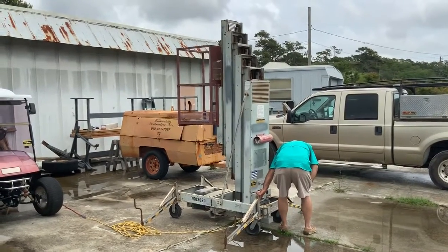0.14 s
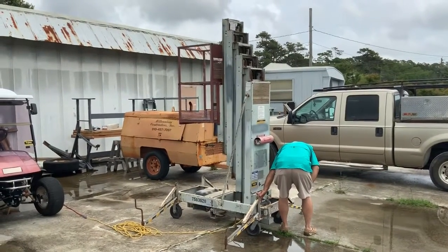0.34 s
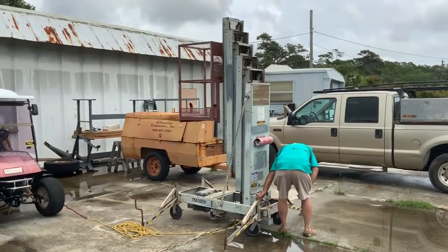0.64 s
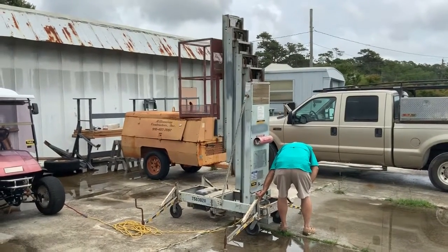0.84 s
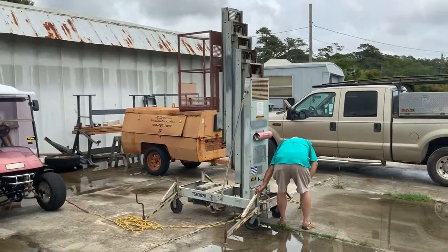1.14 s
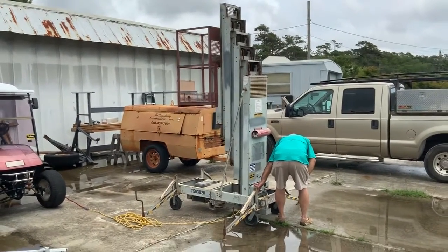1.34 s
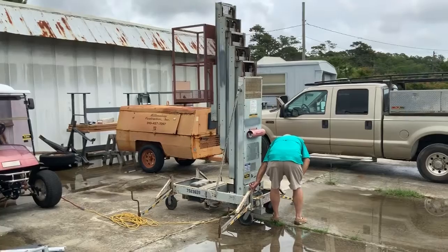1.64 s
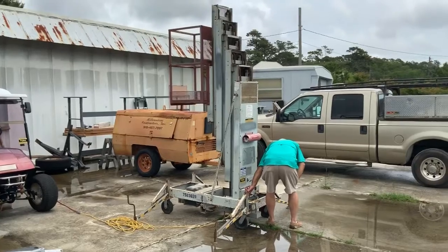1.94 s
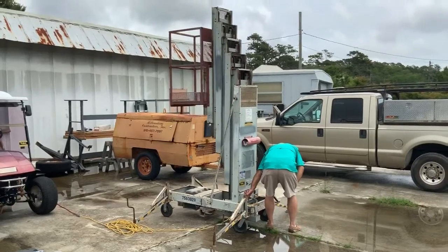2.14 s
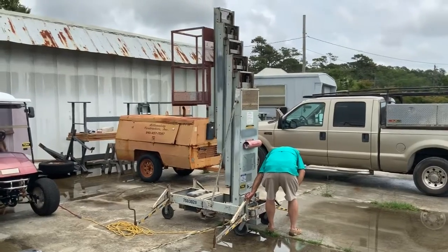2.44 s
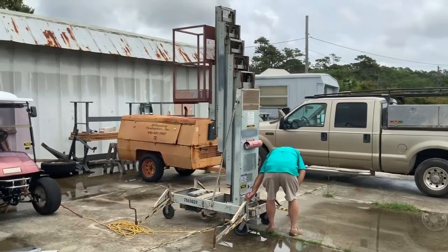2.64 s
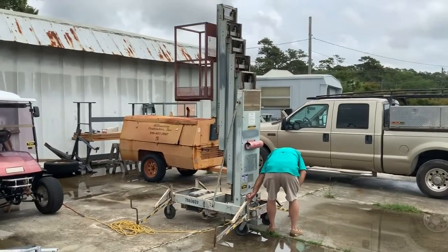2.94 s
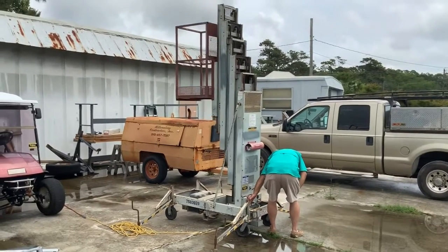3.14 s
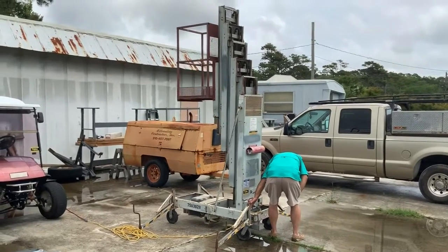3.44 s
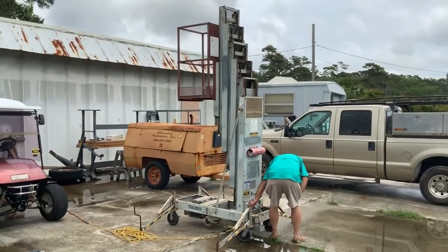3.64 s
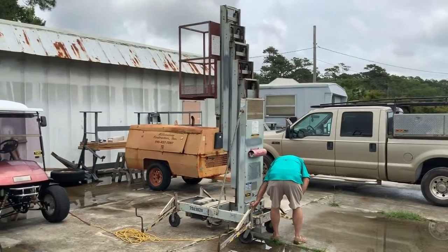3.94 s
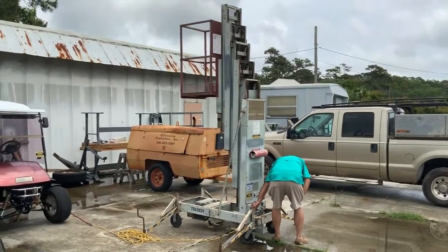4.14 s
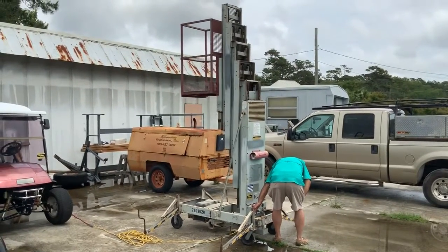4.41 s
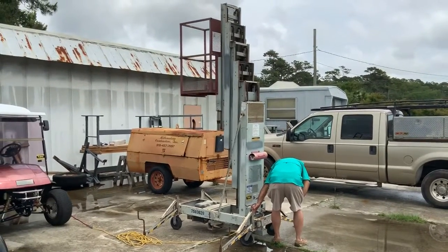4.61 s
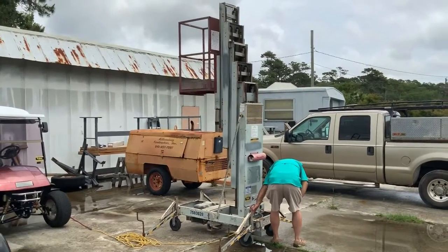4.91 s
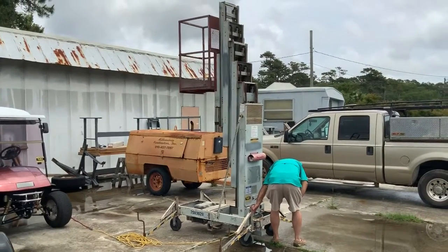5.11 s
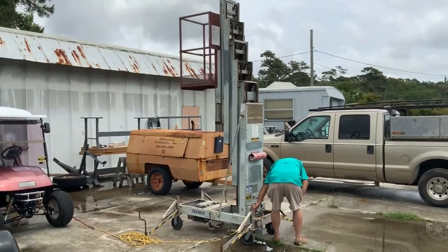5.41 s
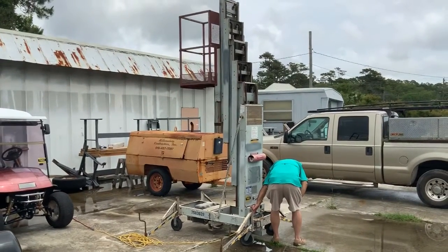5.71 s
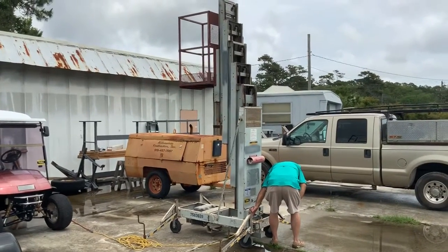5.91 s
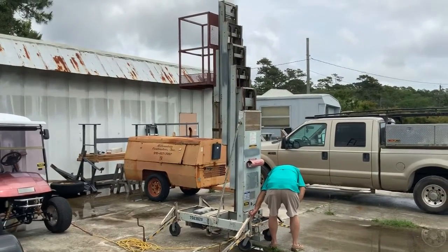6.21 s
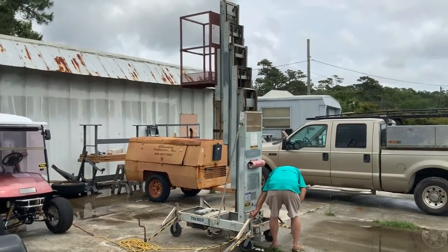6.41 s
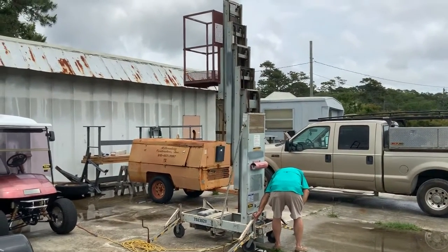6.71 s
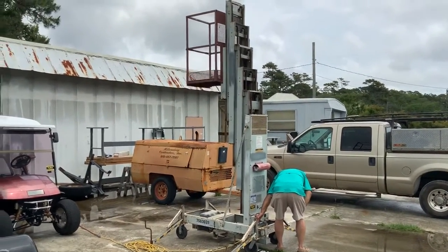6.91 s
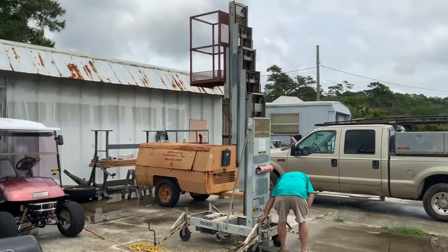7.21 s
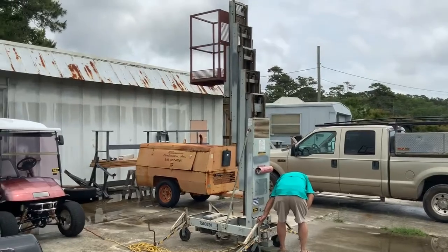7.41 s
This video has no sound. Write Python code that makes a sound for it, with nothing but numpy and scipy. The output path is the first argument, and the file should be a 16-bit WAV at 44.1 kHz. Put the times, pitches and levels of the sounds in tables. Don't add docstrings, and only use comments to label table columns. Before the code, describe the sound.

Outdoors in a yard, a lift's electric hydraulic pump runs throughout: a buzzy, slightly wavering whine over dense motor roar and oil hiss, with a thin metallic rubbing ring. Small chain clinks and dry scrapes gather in the first three seconds, then mostly faint scrapes, and one duller knock near the end. A distant bird whistles a few times, and low wind gusts thump the stereo microphone, strongest around three and a half seconds.

```python
import sys
import numpy as np
from scipy import signal
from scipy.fft import rfft, irfft, next_fast_len
from scipy.io import wavfile
from scipy.ndimage import uniform_filter1d

SR = 44100
rng = np.random.default_rng(int(sys.argv[2]) if len(sys.argv) > 2 else 0)


def magnitude_from_level(level_db):
    exponent = np.asarray(level_db, float) / 20
    return 10 ** exponent


def generate_wav(signal):
    frames = np.transpose(np.atleast_2d(signal))
    scaled = np.clip(frames, -1, 1) * 32767
    pcm = np.round(scaled).astype(np.int16)
    wavfile.write(sys.argv[1], SR, pcm)


N = 333396
TIME = np.arange(N) / SR
# time_s, tooth_rate_hz
TOOTH_RATE = [(0.0, 287.22), (0.33, 284.5), (0.99, 290.08), (1.47, 287.64), (2.28, 289.56), (2.52, 292.23),
              (2.61, 290.36), (3.42, 293.09), (4.11, 290.26), (4.56, 292.96), (4.68, 291.45),
              (4.86, 293.22), (5.04, 289.73), (5.49, 291.56), (6.48, 288.17), (6.99, 287.91),
              (7.26, 294.58), (7.56, 294.54)]


def evened(x):
    return x / np.sqrt(np.mean(x ** 2) + 1e-20)


def read(points, hz):
    f, value = np.transpose(points)
    return np.interp(np.log(hz + 1), np.log(f + 1), value)


def curve(rows, column=1):
    rows = np.array(rows)
    return np.interp(TIME, rows[:, 0], rows[:, column])


def drift(top_hz, low_hz=0.2986):
    t = TIME[::64]
    slow = 0
    for f in np.geomspace(low_hz, top_hz, num=24):
        slow = slow + np.sin(2 * np.pi * (f * t + rng.random()))
    return np.interp(TIME, t, evened(slow))


def coloured(gain, patchy_db=0):
    real, imaginary, patches = rng.standard_normal((N // 256 + 5, 513, 3)).T
    patches = uniform_filter1d(patches, size=14, axis=0)
    patches = evened(uniform_filter1d(patches, size=12, axis=1))
    weight = gain(np.fft.rfftfreq(1024, 1 / SR))[:, None] * magnitude_from_level(patchy_db * patches)
    spectra = (real + 1j * imaginary) * weight
    return evened(signal.istft(spectra, nperseg=1024, noverlap=768)[1][:N])


def resonate(x, hz, width):
    r = np.exp(-np.pi * width / SR)
    pole = r * np.exp(2j * np.pi * hz / SR)
    return 2 * signal.lfilter([(1 - r) ** 2], [1, -2 * pole, pole * pole], x).real


def place(events):
    track = np.zeros(N + SR)
    for s, sound in events:
        track[round(s * SR):][:len(sound)] += sound
    return track[:N]


def ports(shared, left=None, right=None):
    # frequency_hz, left_lag_turns
    lag_points = [(0, 0), (250, .02), (700, .15), (1150, .5), (2620, 1.5), (3900, 2.5), (4800, 3.5),
                  (5930, 4.5), (7400, 5.5), (9000, 6.5), (16750, 11.5)]
    # frequency_hz, likeness (0-1)
    likeness_points = [(40, 0.88), (130, 0.92), (400, 0.72), (1050, 0.12), (1400, 0.95), (2300, 0.58),
                       (3000, 0.74), (4000, 0.75), (5500, 0.84), (7200, 1), (8200, 0.64), (10000, 0.98),
                       (15000, 0.97)]
    # frequency_hz, left_minus_right_db
    balance_points = [(200, 0.3), (470, -1), (900, 2), (1250, 4), (1800, 1), (2300, 1.2), (2900, 5.5),
                      (3600, 1), (7000, -0.5), (8000, 1.8), (10000, -0.4)]
    size = next_fast_len(N)
    hz = np.fft.rfftfreq(size, 1 / SR)
    late = np.exp(-2j * np.pi * np.interp(hz, *np.transpose(lag_points)))
    both = rfft(shared, size) * [late, np.ones(len(hz))]
    if left is not None:
        likeness = read(likeness_points, hz)
        both = np.sqrt(likeness) * both + np.sqrt(1 - likeness) * rfft([left, right], size)
    balance = magnitude_from_level(np.outer([.5, -.5], read(balance_points, hz)))
    return irfft(both * balance, size)[:, :N]


def thump(s, db, hz, length):
    t = np.arange(-1500, 1500) / SR
    bell = np.exp(-(t / length) ** 2 / 2)
    angle = 2 * np.pi * np.cumsum(hz * (0.24 + 1.02 * bell ** 2)) / SR
    angle += np.pi * rng.integers(2) + 0.62 * rng.standard_normal() - angle[1500]
    swing = np.cos(angle) + 0.11 * bell * np.cos(2 * angle)
    return s - 1500 / SR, magnitude_from_level(db - 1.0) * bell * swing


def wind():
    # frequency_hz, density_db_per_hz
    turbulence = [(15, -39), (30, -15), (55, 14.5), (100, 0.5), (150, -7), (250, -7.5), (400, -33.5)]
    # centre_s, half_length_s, over_calm_db
    gusts = [(0.15, 0.13, 1.5), (.65, 0.15, -1), (0.85, 0.089, 0), (1.76, 0.092, 3), (3.5, 0.79, 1),
             (6.6, 0.58, 2.5), (6.1, 0.19, -0.5), (4.7, 0.1, 2), (2.54, .15, 0.5)]
    # peak_s, peak_db, pitch_hz, length_s; gusts make all but the brief click at 0.951 s, where the
    thump_rows = [(0.067, -46, 54, 0.0087), (0.136, -27.5, 60, 0.0079), (0.14, -39.5, 170, .008),
                  (0.172, -34, 76, 0.0097), (0.199, -28, 65, 0.0085), (0.237, -33, 54, 0.0094),
                  (0.452, -38, 92, .01), (0.747, -40, 60.4, 0.024), (1.729, -37, 71.4, 0.015),
                  (2.052, -42, 81.6, 0.013), (2.919, -31.5, 69, 0.0071), (2.953, -31.5, 91, 0.0099),
                  (3.036, -35, 65, .01), (3.077, -32, 69.2, 0.0064), (3.207, -28.5, 92, 0.013),
                  (3.215, -36, 190, 0.0095), (3.126, -37, 55, .02), (3.252, -32, 53.9, 0.015),
                  (3.356, -41, 69.96, .01), (3.41, -21.5, 81, 0.011), (3.461, -34, 99, 0.0076),
                  (3.493, -25, 79.6, 0.005), (3.522, -35, 59.3, 0.013), (3.572, -27, 74.4, 0.0095),
                  (3.643, -33, 59, 0.009), (3.745, -39, 80, 0.0098), (3.782, -32.5, 111, 0.014),
                  (4.063, -45, 80.3, 0.0073), (4.45, -40, 70.1, 0.0062), (0.951, -45, 230, .006),
                  (6.943, -35, 70.24, 0.0084), (7.505, -36, 69.8, 0.024)]
    calm_db, pan_db, arrival_s = -46.5, 2., 0.00049

    def gain(hz):
        return magnitude_from_level(read(turbulence, hz))

    level_db = calm_db + 1.6 * drift(15)
    for s, half, db in gusts:
        level_db = level_db + db * np.exp(-((TIME - s) / half) ** 2)
    left, right = [], []
    for row in thump_rows:
        s, sound = thump(*row)
        pan, lag = [pan_db, arrival_s] * rng.standard_normal(2)
        left.append((s + lag, sound * magnitude_from_level(pan / 2)))
        right.append((s - lag, sound * magnitude_from_level(-pan / 2)))
    steady = magnitude_from_level(level_db) * ports(coloured(gain), coloured(gain), coloured(gain))
    return steady + [place(left), place(right)]


def call(s, length, top_hz, db):
    rise_hz_per_s, fall_hz_per_s = 1100, 2200
    u = np.linspace(0, 1, round(length * SR))
    rise = rise_hz_per_s * length * np.clip(1 - u / .5, 0, 1) ** 2
    fall = fall_hz_per_s * length * np.clip((u - .56) / .44, 0, 1) ** 1.4
    flutter, husk = (evened(uniform_filter1d(noise, size=400))[:len(u)]
                     for noise in rng.standard_normal((2, 6000)))
    angle = 2 * np.pi * np.cumsum(top_hz - rise - fall + 19 * husk) / SR
    whistle = np.sin(angle) + .16 * np.sin(2 * angle)
    level = 2 ** .5 * magnitude_from_level(db + 3.0 * flutter - 2.5 * u)
    return s, level * signal.windows.tukey(len(u), .2) * whistle


def bird():
    # start_s, length_s, top_hz, level_db (rms)
    calls = [(1.387, 0.061, 1750, -48), (1.646, .125, 1742, -45.5), (2.139, 0.126, 1726, -49),
             (2.626, .12, 1727, -44), (2.751, .02, 1716, -49), (5.21, 0.124, 1630, -59),
             (5.55, 0.086, 1730, -57), (6.095, 0.12, 1660, -54)]
    direct = place(call(*row) for row in calls)
    return direct + .25 * np.roll(direct, 900) + .38 * np.roll(direct, 2300)


def clink(s, db, hz):
    t = np.arange(1500) / SR
    ring = np.sin(2 * np.pi * hz * t) + 0.28 * rng.standard_normal(len(t))
    return s - .001, magnitude_from_level(db) * ring * (t / 0.0031) * np.exp(1 - t / 0.0018)


def scrape(s, db, hz, length, width):
    t = np.arange(6000) / SR / length
    grains = rng.standard_normal(6000) * magnitude_from_level(1.5 * rng.standard_normal(60).repeat(100))
    puff = evened(resonate(grains, hz, width))
    return s - .002, 0.75 * magnitude_from_level(db) * t ** 0.38 * np.exp(-t) * puff


def chain_and_slides():
    # peak_s, peak_db, ring_hz
    clinks = [(1.198, -36, 3130), (1.295, -39, 3120), (1.397, -40, 3320), (1.802, -38, 3040),
              (1.815, -40, 3130), (1.858, -38, 3470), (2.041, -30.5, 2950), (2.062, -32, 2970),
              (2.125, -33, 2980), (2.143, -37, 3120), (2.293, -33.5, 3060), (2.753, -35, 2900),
              (2.839, -38, 3020), (2.755, -40, 3500), (7.305, -33, 1450), (7.31, -47, 1150)]
    # peak_s, peak_db, centre_hz, length_s, width_hz
    scrapes = [(.475, -43, 9300, .016, 1800), (.476, -43, 12800, .005, 2000),
               (.752, -48, 11400, .014, 2000), (.811, -47, 8800, .014, 2000),
               (.811, -48, 12000, .004, 6000), (1.2, -47, 10000, .012, 4000),
               (1.198, -47, 14500, .006, 2000), (1.265, -46, 9200, .014, 2000),
               (1.266, -45, 14000, .012, 3000), (1.804, -49, 9000, .015, 5000),
               (2.038, -40, 11700, .006, 4000), (2.06, -45, 11500, .005, 4000),
               (2.122, -48, 11500, .006, 5000), (2.142, -49, 11000, .005, 4000),
               (2.288, -44, 11500, .006, 3000), (2.75, -39, 13500, .004, 8000),
               (2.754, -42, 8600, .006, 3000), (2.837, -41, 11400, .004, 8000),
               (3.236, -47, 11300, .0085, 5000), (4.114, -47, 11300, .018, 6000),
               (4.36, -53, 8200, .05, 1500), (4.475, -49, 9400, .016, 700), (4.55, -55, 9400, .04, 500),
               (4.79, -58, 9350, .05, 500), (4.989, -48, 14000, .005, 3000),
               (5.036, -43.5, 10000, .016, 3000), (5.06, -48, 9500, .016, 4000),
               (5.924, -47, 11300, .02, 3000), (6.088, -49, 9500, 0.015, 3000),
               (6.335, -45, 9680, .016, 9000), (7.138, -44, 9600, .012, 3000),
               (7.138, -48, 14500, .012, 3000), (7.14, -46, 5800, .03, 2000),
               (7.16, -43.5, 10400, 0.027, 6000), (7.324, -50, 9400, .016, 5000)]
    return place([clink(*row) for row in clinks] + [scrape(*row) for row in scrapes])


def rub(shaft):
    # frequency_hz, width_hz, level_db, left_minus_right_db, pulsing (0-1)
    modes = [(382, 40, -23, 5, 0), (670.6, 21, -13.5, 15.5, 0.15), (2214, 120, -5, 2, 0.14),
             (3470, 18, -17.5, 6, 0), (4010, 120, -7.5, -11, 0.65), (4298, 55, 1.2, -2.5, .98),
             (4378, 30, -5.5, -8, 0.77), (4630, 37, -7.5, 1, 0.45), (4940, 190, -5.5, -3.5, 0.74),
             (6537, 52, -8.5, 3, 0.53)]
    # time_s, level_db
    contact = [(0, -57.5), (.9, -57.5), (1.6, -54), (2.3, -57), (4, -55.5), (5.75, -56.5), (6.3, -59),
               (6.67, -54.5), (6.93, -62), (7.56, -57)]
    # angle_turns, level_db
    spots = [
        (-.18, 0.8),
        (.03, 0.5),
    ]
    knocks = 0
    for at, db in spots:
        passing = np.maximum(np.diff(np.floor(shaft - at), prepend=0), 0)
        knocks = knocks + magnitude_from_level(db) * passing
    knocks = evened(knocks * magnitude_from_level(0.63 * rng.standard_normal(N)))
    out = np.zeros((2, N))
    for hz, width, db, pan_db, pulsing in modes:
        friction = rng.standard_normal(N)
        drive = np.sqrt(pulsing) * knocks + np.sqrt(1 - pulsing) * friction
        level = magnitude_from_level(db + 0.14 * drift(8.4) + [[pan_db / 2], [-pan_db / 2]])
        out += level * evened(resonate(drive, hz, 1.32 * width))
    return magnitude_from_level(curve(contact) - 2.9) * [ports(out[0])[0], ports(out[1])[1]]


def roar(shaft):
    # frequency_hz, density_db_per_hz
    floor_points = [(120, -17.5), (220, -13.5), (470, -10.5), (700, -11.5), (1250, -12), (2000, -11.5),
                    (2600, -15), (3500, -16), (5200, -19.5), (7200, -27), (8800, -27), (12500, -27),
                    (13400, -39), (14400, -25.5)]
    # frequency_hz, width_hz, over_roar_db
    humps = [(381, 22, 6.5), (476, 44, 2.5), (660, 22, 6.5), (1680, 110, -0.5), (2290, 364, 7.5),
             (2560, 98, -4.5), (3200, 110, 1), (3420, 68, -2.5), (4000, 38, -2), (4830, 280, -2.5),
             (5100, 90, -7), (8800, 180, 9), (11300, 140, 3.5), (1260, 300, -0.5), (9400, 130, -4),
             (13500, 490, -19), (5300, 89, -3), (4650, 65, -5), (4270, 260, -0.5)]
    base_db, sink_db_per_s, db_per_hz = -43.5, 0.325, 0.03

    def gain(hz):
        level_db = read(floor_points, hz)
        for f, width, db in humps:
            level_db = level_db + db / (1 + (2 * (hz - f) / width) ** 2)
        return magnitude_from_level(level_db)

    wear = [np.interp(shaft % 1, np.linspace(0, 1, num=700), pattern)
            for pattern in rng.standard_normal((2, 700))]
    blend = .9 * drift(1.5)
    size = next_fast_len(N)
    repeating = rfft(np.cos(blend) * wear[0] + np.sin(blend) * wear[1], size)
    repeating = evened(irfft(repeating * gain(np.fft.rfftfreq(size, 1 / SR)), size)[:N])
    shared, left, right = (coloured(gain, patchy_db=1.68) for _ in range(3))
    throb = 1 + 0.04 * np.cos(2 * np.pi * shaft) + 0.032 * np.cos(4 * np.pi * shaft)
    rate = curve(TOOTH_RATE)
    level_db = base_db - sink_db_per_s * TIME + db_per_hz * (rate - rate.mean()) + 0.42 * drift(8.7)
    return magnitude_from_level(level_db) * throb * ports(0.76 * shared + .65 * repeating, left, right)


def tone(turns, multiple, level, pan_db, lag, waver_db):
    level = 2 ** .5 * level * magnitude_from_level(waver_db * drift(25, low_hz=2))
    jitter = .022 * min(multiple, 14) * drift(40)
    angle = 2 * np.pi * (multiple * turns + rng.random()) + jitter
    lags = 2 * np.pi * np.array([[lag], [0]])
    return level * magnitude_from_level(np.outer([.5, -.5], pan_db)) * np.sin(angle - lags)


def gear_tones(turns, rings, sides):
    fade_s = .14
    out, t = np.zeros((2, N)), TIME[::256]
    for multiple, idle_db, pan_db, lag, waver_db in sides:
        power = magnitude_from_level(idle_db) ** 2
        for k, start, end, db in rings:
            if k == multiple:
                fade = np.clip(.5 + np.minimum(t - start, end - t) / fade_s, 0, 1)
                power = power + magnitude_from_level(db) ** 2 * fade
        level = np.interp(TIME, t, np.sqrt(power) * np.ones(len(t)))
        out += tone(turns, multiple, level, pan_db, lag, waver_db)
    return out


def shaft_sidebands(shaft):
    # shaft_order, idle_db, left_minus_right_db, left_lag_turns, waver_db
    sides = [(112, -76, 8, -.1, 3), (73, -75, 1, -.06, 1.5), (76, -75, 1, -.06, 1.5), (72, -75, 1, -.06, 2),
             (14, -72, -2, .07, 4), (15, -70, -2, .07, 4), (30, -76, -2, .1, 4), (78, -80, 1, -.06, 1.5)]
    # shaft_order, start_s, end_s, level_db (rms)
    rings = [(112, 2.4, 5.0, -69), (73, 7.27, 7.7, -54), (14, 2.9, 4.6, -65), (14, 5.2, 7.7, -63),
             (15, 0, 2.9, -64), (15, 3.9, 6.3, -64), (78, .26, .43, -49), (30, 4.0, 6.1, -67),
             (76, 2.4, 3.2, -65), (72, 2.9, 3.7, -61), (76, .15, .8, -63)]
    return gear_tones(shaft, rings, sides)


def mast_tones(teeth):
    # tooth_multiple, idle_db, left_minus_right_db, left_lag_turns, waver_db
    sides = [(3, -72, -10.5, 0.3, 2.4), (6, -68, 10, -0.074, 2.8), (12, -76, 0, .1, 2.5),
             (10, -75, 12, -0.18, 2.7), (16, -75, -3, 0.28, 1.8), (18, -80, 0, 0.1, 1.5)]
    # tooth_multiple, start_s, end_s, level_db (rms)
    rings = [(3, 0, .4, -62), (3, 1.0, 1.15, -62), (3, 1.7, 1.95, -63), (3, 2.7, 3.35, -63),
             (3, 3.35, 3.5, -57), (3, 3.5, 4.4, -65), (3, 4.4, 4.9, -61), (3, 4.9, 5.4, -66),
             (3, 5.4, 6.1, -64), (3, 6.3, 7.1, -58.5), (3, 7.27, 7.7, -53.5), (6, 0, .45, -60),
             (6, .9, 1.2, -59.5), (6, 1.7, 2.4, -61), (12, 1.2, 2.8, -69), (12, 2.8, 5.0, -74),
             (6, 2.6, 4.05, -60), (6, 5.8, 6.1, -62), (6, 6.4, 6.8, -62), (6, 7.2, 7.7, -58),
             (10, 1.6, 2.4, -69), (10, 2.4, 2.8, -64), (10, 2.8, 3.6, -71), (10, 3.6, 4.8, -63),
             (10, 4.8, 5.8, -67), (16, .72, 1.35, -67), (16, 2.55, 3.6, -63), (16, 3.6, 4.8, -66),
             (16, 4.8, 5.6, -70), (18, 7.2, 7.7, -66), (18, 2.8, 3.4, -69)]
    return gear_tones(teeth, rings, sides)


def pump_tones(teeth):
    # tooth_multiple, idle_db, left_minus_right_db, left_lag_turns, waver_db
    sides = [(1, -66, -0.2, 0.053, 1.1), (5, -70, -1, -0.36, 2.8), (7, -69, 1, -0.057, 1.8)]
    # tooth_multiple, start_s, end_s, level_db (rms)
    rings = [(1, 0, .68, -58), (1, .68, 2.48, -54), (1, 2.48, 3.33, -52.5), (1, 3.33, 4.0, -57),
             (1, 4.0, 6.9, -61), (1, 6.9, 7.2, -58), (5, 0, .6, -62), (5, 1.2, 2.0, -55),
             (5, 2.0, 2.4, -61), (5, 3.05, 4.5, -58), (5, 4.5, 5.7, -63), (5, 5.7, 7.15, -58.5),
             (7, 0, .25, -55), (7, .25, .45, -66), (7, .47, 1.0, -50.5), (7, 1.0, 1.4, -53),
             (7, 1.4, 1.95, -49.5), (7, 1.95, 2.35, -53), (7, 2.4, 3.1, -61), (7, 4.2, 5.0, -65),
             (7, 6.05, 6.78, -59), (7, 6.78, 7.02, -52.5)]
    # time_s, level_db (rms), left_minus_right_db
    ripple = [(0, -49.5, -4), (.9, -47.5, -2.5), (1.05, -45, -2), (1.45, -47.5, -1), (2.3, -44, -3.5),
              (3.1, -42.5, -1), (4.85, -44, -3.5), (5.1, -47, -9), (5.45, -46.5, -7.5), (6.05, -47.5, -10),
              (6.2, -46.5, -3.5), (7.0, -45.5, -5.5), (7.3, -50, -7), (7.56, -49.5, -7)]
    main = tone(teeth, 2, magnitude_from_level(curve(ripple)), curve(ripple, column=2), lag=-0.038, waver_db=.35)
    return main + gear_tones(teeth, rings, sides)


def tooth_count():
    slip_s, slip_teeth = .951, -2.3
    wobble_hz, wobble_from_s, wobble_teeth = 3.42, .09, .02
    teeth = np.cumsum(curve(TOOTH_RATE)) / SR + slip_teeth * (TIME > slip_s)
    return teeth - wobble_teeth * np.cos(2 * np.pi * wobble_hz * (TIME - wobble_from_s))


def scene():
    teeth = tooth_count()
    shaft = teeth / 11
    background = wind() + ports(bird() + chain_and_slides())
    machine = rub(shaft) + roar(shaft)
    tones = shaft_sidebands(shaft) + mast_tones(teeth) + pump_tones(teeth)
    return background + machine + tones


def band_limit(x):
    return signal.sosfilt(signal.butter(12, 15710, fs=SR, output="sos"), x)


def record(dry):
    edge_hz = 15650
    limited = signal.oaconvolve(dry, signal.firwin(95, edge_hz, fs=SR)[None], "same")
    return band_limit(limited)


dry = scene()
out = record(dry)
generate_wav(out)
```